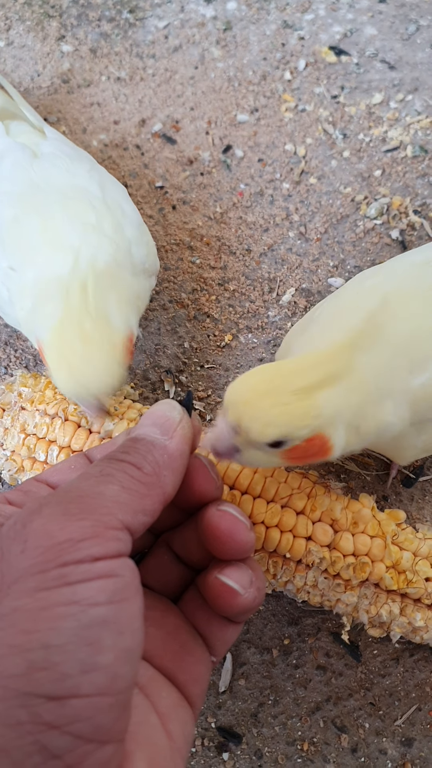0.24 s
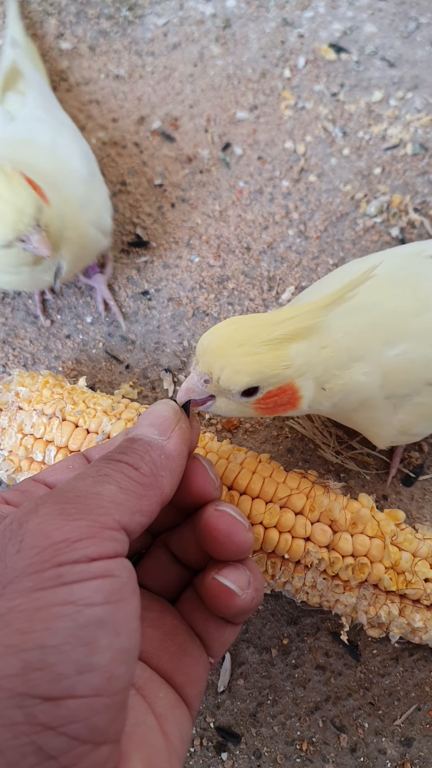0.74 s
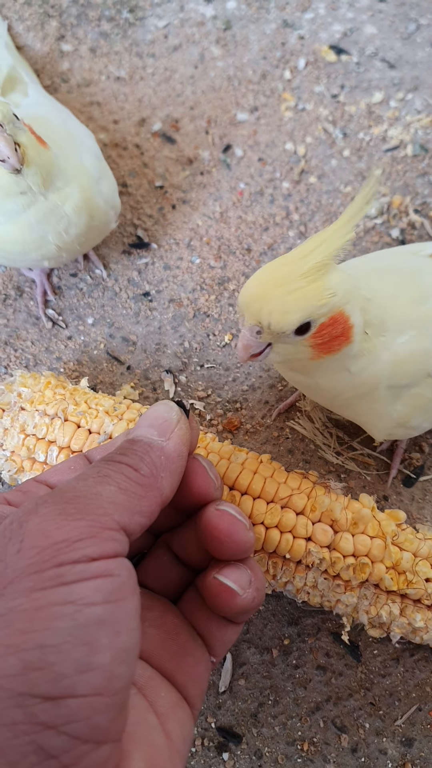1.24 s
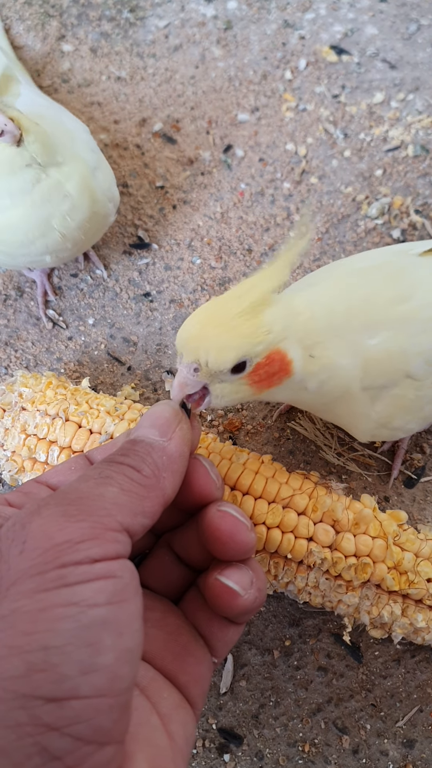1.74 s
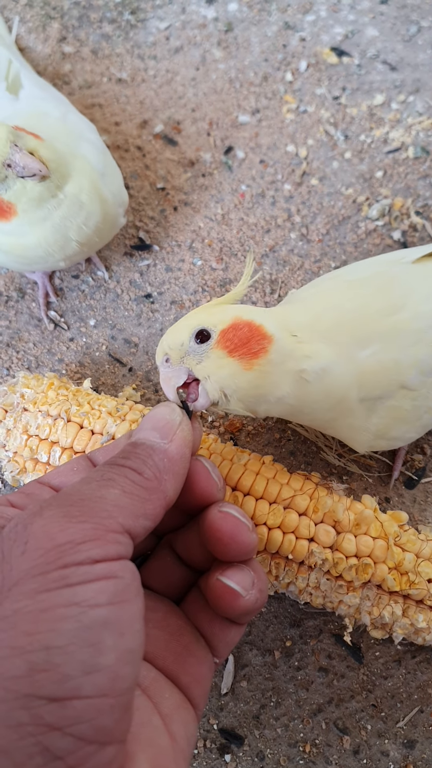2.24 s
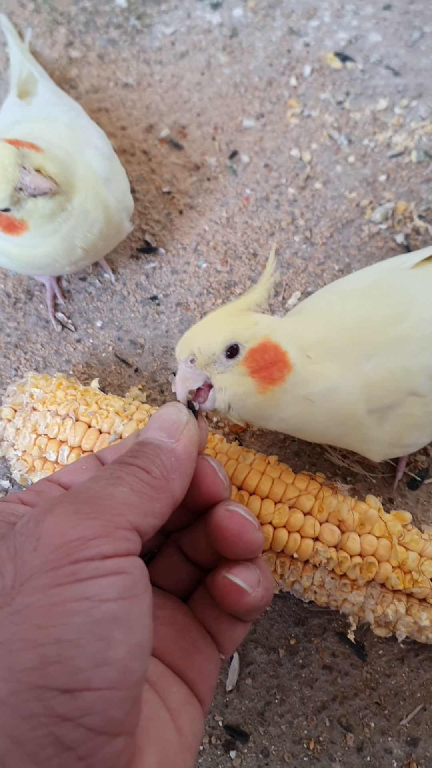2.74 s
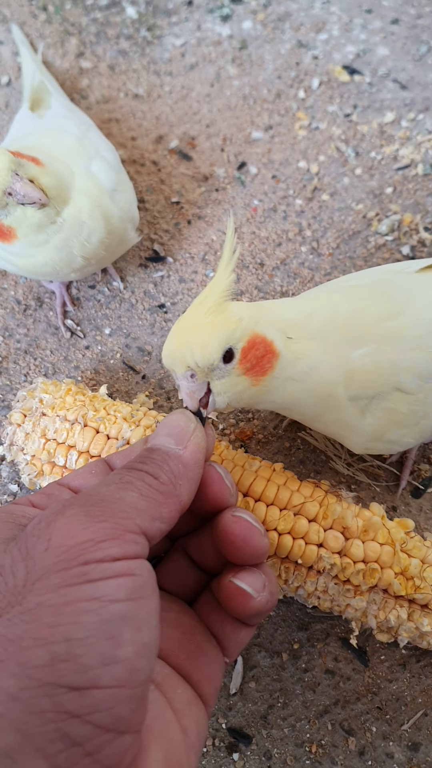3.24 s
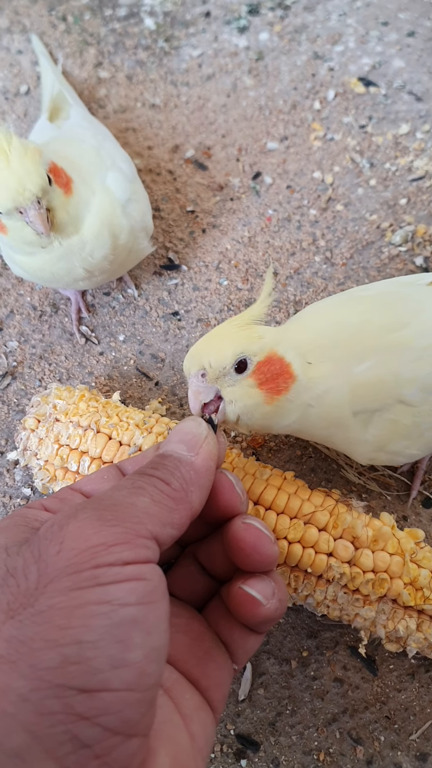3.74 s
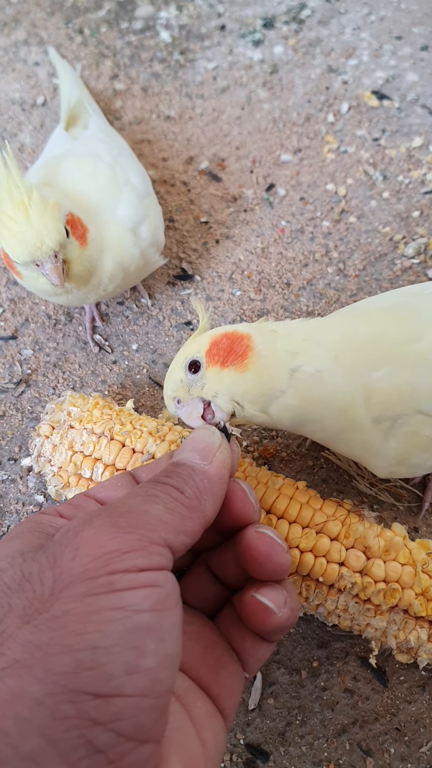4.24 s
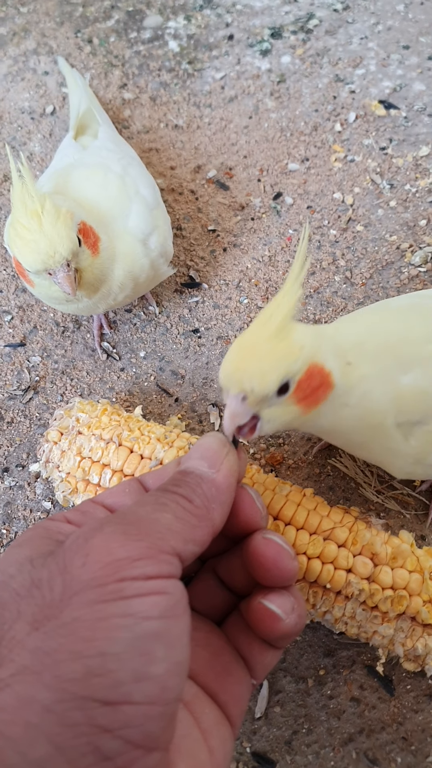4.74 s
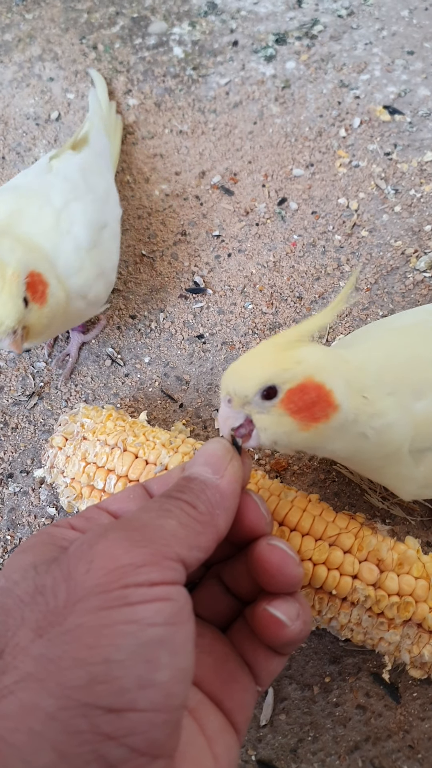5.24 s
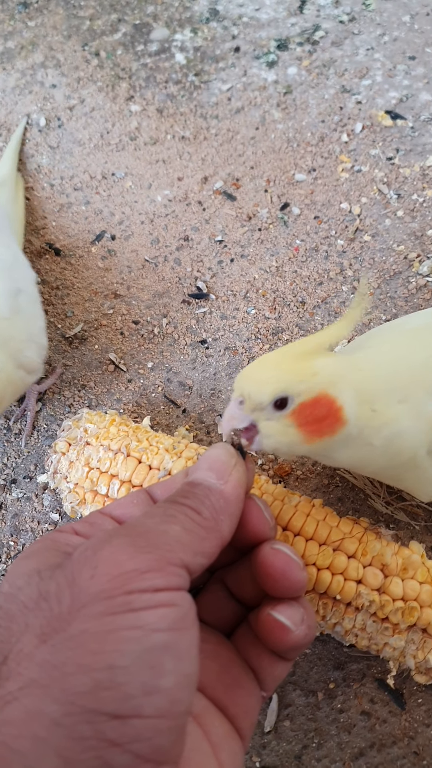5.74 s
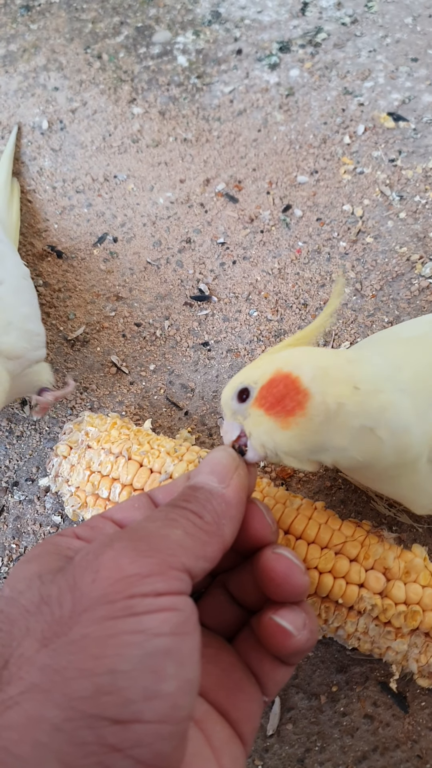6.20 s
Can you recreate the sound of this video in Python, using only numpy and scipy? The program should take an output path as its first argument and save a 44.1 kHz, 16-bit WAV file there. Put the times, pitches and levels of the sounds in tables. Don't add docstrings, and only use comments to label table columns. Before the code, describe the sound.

Small parrots whistle bright rising, stepped and arching calls in a hard-walled aviary, with beak cracks and scratches close by over a low engine hum.

```python
import sys
import numpy as np
from scipy import signal
from scipy.fft import rfft, irfft, next_fast_len
from scipy.io import wavfile
from scipy.ndimage import uniform_filter1d, minimum_filter1d

SR = 44100
rng = np.random.default_rng(int(sys.argv[2]) if len(sys.argv) > 2 else 0)


def inscribe(sig):
    pcm = np.round(np.clip(np.atleast_2d(sig).T, -1, 1) * 32767)
    wavfile.write(sys.argv[1], SR, pcm.astype(np.int16))


def gain_from_db(level_db):
    decades = np.asarray(level_db, float) / 20
    return 10 ** decades


N = 285327
LEAD = 11025


def on_log(table, hz):
    f, v = np.transpose(table)
    return np.interp(np.log(np.maximum(hz, 1)), np.log(f), v)


def shape(x, gain):
    n = next_fast_len(x.shape[-1], True)
    hz = np.arange(n // 2 + 1) * SR / n
    return irfft(rfft(x, n) * gain(hz), n)[..., :x.shape[-1]]


def unit(x):
    return x / np.sqrt(np.mean(x ** 2))


def walk(rate, size=N):
    k = int(SR / rate)
    held = np.repeat(rng.standard_normal(size // k + 1), k)
    return 1.4 * uniform_filter1d(uniform_filter1d(held, k), k)[:size]


# pitch_hz, correlation (0-1)
PORT_LIKENESS = [(60, 0.98), (130, 0.97), (290, 0.72), (640, 0.33), (1410, -0.01), (3100, -0.02),
                 (6820, 0.04), (15000, -0.02)]


def wide_noise():
    mid, side = rng.standard_normal((2, N))
    like = lambda hz: np.clip(on_log(PORT_LIKENESS, hz), 0, 1)
    mid = shape(mid, lambda hz: np.sqrt((1 + like(hz)) / 2))
    side = shape(side, lambda hz: np.sqrt((1 - like(hz)) / 2))
    return np.array([mid + side, mid - side])


# band_hz, t60_s
WALL_DECAY = [(1200, 0.41), (3000, 0.38), (6000, 0.3), (12000, 0.26)]


def aviary(x, direct_db, gap_ms, build_ms):
    t = np.arange(SR * 3 // 4) / SR
    noise = rng.standard_normal((2, len(t)))
    centres = [hz for hz, _ in WALL_DECAY]
    tail = 0
    for k, (hz, t60_s) in enumerate(WALL_DECAY):
        this_band = list(zip(centres, np.arange(len(centres)) == k))
        band = shape(noise, lambda f: on_log(this_band, f))
        tail = tail + band * np.exp(-np.log(1000) * t / t60_s)
    tail = tail * np.clip((1000 * t - gap_ms) / build_ms, 0, 1)
    tail = tail / np.sqrt(np.sum(tail ** 2) / 2)
    tail[[0, 1], [0, 20]] = gain_from_db(direct_db)
    return signal.fftconvolve(x[None], tail, axes=1)[:, :len(x)]


# start_s, width_s, town_db, boom_db
TRAFFIC_SWELLS = [(.0, .1, 4, -6.5), (.45, 0.22, 2, 2.5), (.8, 0.065, -0.5, 5.5), (1.35, 0.1, 3, 1.5),
                  (2.1, 0.32, 3.5, .5), (3.36, 0.082, 5.5, 5.5), (4.2, 0.61, 0.5, 0), (4.9, 0.087, 7, 6),
                  (6.4, 0.22, 3.5, 1)]


def traffic_swells():
    t = np.arange(N) / SR
    return sum(np.outer(db, np.exp(-((t - s) / width) ** 2)) for s, width, *db in TRAFFIC_SWELLS)


# pitch_hz, level_db (per Hz)
TOWN_COLOUR = [(100, -37), (170, -19.5), (237, 5), (296, -13), (336, -7), (440, -13), (623, -3),
               (778, -7.5), (956, -11.5), (2010, -16.5), (3290, -20.5), (3730, -26), (5900, -28.5),
               (7300, -41.5), (9750, -40), (16500, -53)]


def town(swell_db):
    colour = lambda hz: gain_from_db(on_log(TOWN_COLOUR, hz)) * np.clip(hz / 170, 0, 1) ** 3
    hum = unit(shape(wide_noise(), colour))
    return gain_from_db(-53.5 + swell_db + 0.4 * walk(7.0)) * hum


# pitch_hz, width_hz, level_db
AIR_MODES = [(83.5, 10, 11.5), (117.4, 25, 2.5), (158.4, 8, 0), (184, 2.8, -20.5), (240, 16, -9),
             (310, 16, -8)]
# start_s, load_db
ENGINE_LOAD = [(0, -20), (.3, -25.5), (.42, -8.5), (.67, -5), (.9, -5), (1.05, -15), (1.35, -6),
               (1.65, -20), (1.9, -8.5), (2.3, -10.5), (2.7, -6.5), (2.9, -21.5), (3.6, -15), (4.5, -25.5),
               (5.6, -19), (6.47, -18.5)]
# start_s, level_db
EXHAUST_LEVEL = [
    (0, -70),
    (2, -69),
    (2.4, -70.5),
    (2.9, -74),
    (3.4, -80),
    (3.7, -93),
    (4.3, -112),
    (6.47, -112),
]
# pitch_hz, level_db (per Hz)
EXHAUST_COLOUR = [(530, -38), (900, -29.5), (1010, -4.5), (1320, -5.5), (2960, -5), (6050, -9),
                  (7410, -20.5), (11000, -15.5), (15500, -25)]


def diesel(swell_db):
    t = np.arange(N) / SR
    load_db = np.interp(t, *np.transpose(ENGINE_LOAD))
    hiss_db = np.interp(t, *np.transpose(EXHAUST_LEVEL))
    cycles = (t - .045) * 11 + 0.02 * walk(1.6)
    strengths = gain_from_db(1.4 * rng.standard_normal(100))
    strength = strengths[np.clip(cycles + 1, 0, 99).astype(int)]
    puff = strength * (1 + np.cos(2 * np.pi * (cycles - .17))) / 2
    thud = strength * np.sin(np.pi * np.clip(cycles % 1 / 0.088, 0, 1)) ** 2

    dull = lambda hz: 1 / (1 + (hz / 1500) ** 2)
    modes = lambda hz: sum(gain_from_db(g) * 1j * hz * w / (f * f - hz * hz + 1j * hz * w) for f, w, g in AIR_MODES)
    thud = shape(thud, lambda hz: (modes(hz) + .4 * np.clip(hz / 28, 0, 1) ** 2) * dull(hz))
    air = shape(wide_noise(), lambda hz: np.abs(modes(hz)) * np.clip(hz / 65, 0, 1) ** 2 * dull(hz))
    boom_db = -41 + .25 * load_db + swell_db
    boom = gain_from_db(boom_db) * unit(air) + gain_from_db(-36.5 + load_db) * unit(thud)

    colour = lambda hz: gain_from_db(on_log(EXHAUST_COLOUR, hz)) * np.clip(hz / 900, 0, 1) ** 3
    hiss = unit(shape(wide_noise(), colour))
    top = shape(hiss, lambda hz: np.clip(hz / 7000, 0, 1) ** 4)
    hiss = hiss + top * (0.43 * puff - .6)
    return boom + gain_from_db(hiss_db + 20.0) * hiss


# start_s, length_s, pitch_hz, level_db (peak)
DOVE_COO = [
    (0.229, .07, 727, -48.5),
    (0.305, .085, 720.5, -54),
]


def dove():
    t, tone = np.arange(N) / SR, 0
    for s, length, hz, db in DOVE_COO:
        swell = np.sin(np.pi * np.clip((t - s) / length, 0, 1)) ** 2
        tone = tone + gain_from_db(db) * np.sin(2 * np.pi * hz * t) * swell
    return gain_from_db(6.5) * aviary(tone, 7.2, 9.6, 10)


# start_s, level_db (peak)
WIRE_TAPS = [
    (3.4901, -32.5),
]
# pitch_hz, level_db, t60_s (undamped)
WIRE_PARTIALS = [(2315, -13.5, 0.87), (2930, 6.5, 0.14), (3280, -2.5, 0.35), (3670, -3.5, 0.3),
                 (4710, 4, 0.39), (5230, 1, 0.55), (5800, -7, 0.3)]


def wire():
    out, t = np.zeros(N + SR), np.arange(SR // 2) / SR
    damping = .04
    for s, db in WIRE_TAPS:
        ring = 0
        for hz, partial_db, t60_s in WIRE_PARTIALS:
            decay = np.exp(-np.log(1000) * t / (damping * t60_s))
            ring = ring + gain_from_db(partial_db) * np.sin(2 * np.pi * hz * t) * decay
        i = int(s * SR)
        out[i:i + len(t)] += gain_from_db(db) * ring
    return aviary(out[:N], -12, 2.5, 8)


# start_s, level_db (peak), body_db, pan_db (left minus right)
SEED_CRACKS = [(0.195, -53.5, 5, 4.5), (0.7265, -45.5, -24, -5), (1.876, -53, -7, -2.5),
               (2.3344, -48.5, -16.5, 14), (2.7341, -47, 14, -1.5), (2.8565, -65, -1, -7),
               (3.2533, -32.5, 12, 2), (3.6331, -52.5, -11.5, 10.5), (4.31, -52.5, -9, 11.5),
               (4.3357, -45.5, 7.5, 9.5), (4.4947, -68, 12, 4), (4.611, -76.5, 15.5, 3),
               (4.7887, -65, 10.5, 8), (5.308, -45, -11, -2.5), (5.5649, -46.5, -12.5, -0.5),
               (5.7049, -69.5, -17, 8), (5.8821, -69, -3, -3)]
# start_s, level_db (peak), body_db, length_ms, pan_db (left minus right)
PERCH_SCRATCHES = [
    (0.8554, -40, 9.5, 16, 3.5),
    (1.912, -31.5, 8, 17, 0.5),
    (2.5476, -30, -1.5, 28, 0),
    (3.2983, -38, 3, 20, 1.5),
    (3.489, -42, 7, 7.2, 1),
    (5.3171, -36, 14.5, 4.1, -2.5),
    (6.461, -42, -10, 5.9, 1),
]


def beaks():
    near, far, t = np.zeros((2, N + SR)), np.zeros(N + SR), np.arange(SR // 5) / SR
    rows = [(s, db, body_db, 1.1, pan_db, -4.5) for s, db, body_db, pan_db in SEED_CRACKS]
    rows += [(*row, -4) for row in PERCH_SCRATCHES]
    for s, db, body_db, ms, pan_db, walls_db in rows:
        noise, i = rng.standard_normal((2, len(t))), int(s * SR)
        body = lambda hz: gain_from_db(body_db) * np.clip(hz / 900, 0, 1) ** 2
        colour = lambda hz: np.where(hz > 4000, 1, body(hz)) / (1 + (hz / 12000) ** 2 * ms / 6)
        burst = gain_from_db(db) * shape(noise, colour) * np.exp(-1000 * t / ms)
        near[:, i:i + len(t)] += burst * gain_from_db([[pan_db / 2], [-pan_db / 2]])
        far[i:i + len(t)] += gain_from_db(walls_db) * burst[0]
    return near[:, :N] + aviary(far[:N], -46, 2.1, 7.4)


# glide bend (power), slope_db (per octave under its top), overtone lift_db, shrill_db,
# release_db (lost if it ends the call)
RISE_RULE = (0.98, 16, -3.5, 6, 1.5)
STEP_RISE_RULE = (0.8, 20.5, -1, 2.5, 1.5)
HOLD_RULE = (1.17, 6.5, -6.5, -0.5, 27.5)
FALL_RULE = (0.64, 6, -4, 1.5, 21)


def sing(notes, voices, rise):
    u, paths = np.linspace(0, 1, 12), []
    for s, length, a_hz, b_hz, db in notes:
        rule = HOLD_RULE
        if b_hz > 1.1 * a_hz:
            rule = rise
        elif a_hz > 1.1 * b_hz:
            rule = FALL_RULE
        bend, slope_db, lift_db, shrill_db, release_db = rule
        _, rough_db, low_db, sharp_db = [v for v in voices if v[0] < s + .05][-1]
        hz = a_hz * (b_hz / a_hz) ** u ** bend
        last = not any(s < n[0] < s + length + .03 for n in notes)
        db = db + slope_db * np.log2(hz / hz.max()) - last * release_db * u ** 2.62
        lift_db = rough_db + lift_db + low_db * np.log2(2800 / hz)
        paths.append(np.transpose([s + length * u, hz, db, lift_db, shrill_db + sharp_db + 0 * u]))
    return paths


# pitch_hz, level_db (against the whistle)
THROAT_COLOUR = [(2400, -7), (3600, -0.5), (4800, -9), (5400, -11.5), (6300, -27.5), (7000, -27.5)]


def parrot(calls, beak, air_db, hoarse_db):
    out = np.zeros(N + LEAD)
    warble, rasp, tremor = (walk(rate, size=len(out)) for rate in (70, 420, 260))
    air = shape(rng.standard_normal(len(out)), lambda hz: gain_from_db(on_log(beak, hz)) * (hz > 7000))
    throat_band = lambda hz: gain_from_db(on_log(THROAT_COLOUR, hz) / 2) * (hz > 3300) * (hz < 6800)
    hoarse = unit(shape(rng.standard_normal(len(out)), throat_band))
    for call in calls:
        s, *columns = np.transpose(call)
        i = np.arange(int(s[0] * SR), int(s[-1] * SR)) + LEAD
        hz, db, lift_db, shrill_db = (np.interp((i - LEAD) / SR, s, c) for c in columns)
        hz = uniform_filter1d(hz, size=350) * (1.025 + .012 * warble[i] - .033 * np.abs(rasp[i]))
        phase = 2 * np.pi * np.cumsum(hz) / SR
        tone = np.sin(phase) + gain_from_db(air_db + shrill_db) * air[i]
        tone += gain_from_db(hoarse_db + lift_db / 2) * hoarse[i]
        for k in range(2, 13):
            by_beak_db = shrill_db + on_log(beak, k * hz)
            by_throat_db = lift_db + on_log(THROAT_COLOUR, k * hz)
            overtone_db = -.6 * (k - 2) + np.where(k * hz > 7000, by_beak_db, by_throat_db)
            tone += (k * hz < 16000) * gain_from_db(overtone_db) * np.sin(k * phase)
        edge = np.clip(np.minimum(i - i[0], i[-1] - i) / (0.0037 * SR), 0, 1)
        out[i] += np.sqrt(2) * gain_from_db(db + 3 * tremor[i]) * edge * tone
    return out


# start_s, overtone lift_db, low_db (extra lift per octave under the throat pitch), shrill_db
CALL_VOICES = [
    (-.2, 1.5, -1.5, 3),
    (.235, 3, 5, 1.5),
    (.925, -6, 14, -4.5),
    (1.457, -2, 16.5, -3.5),
    (2.937, 0, 15, 4.5),
    (3.825, -7, 8.5, -1),
    (4.858, 1, 10.5, -0.5),
    (6.095, -2, -2, -5.5),
]
ANSWERING_VOICE = [
    (1.08, 10, 3, 5),
]
# pitch_hz, level_db
ARCH_BEAK = [(7000, -39.5), (8600, -54), (10100, -53.5), (11600, -39.5), (13000, -49.5), (14600, -39),
             (16000, -48)]
# start_s, length_s, from_hz, to_hz, level_db (whistle)
ARCHED_CALLS = [
    (1.457, .143, 1303, 3037, -18),
    (1.6, .068, 2954, 3014, -18.5),
    (1.668, .12, 2878, 1877, -22),
    (2.937, .128, 1236, 2482, -26.5),
    (3.065, .032, 2566, 2757, -21),
    (3.097, 0.12, 2760, 1618, -22),
    (4.858, .157, 1250, 2958, -19.5),
    (5.015, .063, 3033, 3087, -19),
    (5.078, .15, 2951, 1896, -21),
]
SHRILL_CALL = [
    (.235, 0.054, 1360, 2360, -23),
    (.29, 0.022, 2555, 3000, -22),
    (.315, .068, 2980, 2880, -23),
    (.383, 0.046, 2250, 3200, -19),
    (.425, .06, 3260, 3230, -23.5),
]
ANSWER_CALL = [
    (1.08, .155, 1280, 3385, -19.5),
    (1.235, 0.041, 3464, 3498, -13.5),
]


def first_perch():
    calls = sing(ARCHED_CALLS, CALL_VOICES, RISE_RULE)
    calls += sing(SHRILL_CALL, CALL_VOICES, STEP_RISE_RULE)
    calls += sing(ANSWER_CALL, ANSWERING_VOICE, RISE_RULE)
    return aviary(parrot(calls, ARCH_BEAK, 2.2, -32), -6, 2.0, 11.0)


# pitch_hz, level_db
STEP_BEAK = [(7000, -36), (8600, -36), (10100, -40), (11400, -51), (12600, -56), (14500, -60.5),
             (16000, -60)]
# start_s, length_s, from_hz, to_hz, level_db (whistle)
STEPPED_CALLS = [(-.2, .15, 1274, 2555, -17), (-.05, 0.12, 2971, 2914, -17.5),
                 (.085, .03, 2700, 1800, -18.5), (.925, 0.059, 1388, 2412, -22.5),
                 (.99, 0.094, 2918, 2840, -18.5), (1.092, 0.094, 3198, 3202, -18.5),
                 (3.825, 0.084, 1495, 2703, -19), (3.891, 0.049, 2724, 2890, -16),
                 (3.961, .095, 2768, 2771, -18), (6.095, 0.071, 1588, 1858, -33.5),
                 (6.15, .033, 1833, 2800, -19.5), (6.18, .06, 2950, 2893, -24.5),
                 (6.24, .037, 2250, 3350, -15), (6.277, 0.055, 3395, 3386, -16.5)]
FAR_PEEPS = [
    (2.79, 0.028, 2900, 3180, -56),
    (4.72, 0.044, 2700, 2816, -66.5),
]
SYRINX_UNDERTONES = [
    (0.296, 0.12, 2250, 2420, -29),
    (0.992, 0.13, 2054, 2165, -29.5),
    (3.888, .09, 2052, 2160, -30),
    (6.176, 0.12, 1964, 2138, -29.5),
]


def second_perch():
    calls = sing(STEPPED_CALLS, CALL_VOICES, STEP_RISE_RULE)
    calls += sing(FAR_PEEPS + SYRINX_UNDERTONES, CALL_VOICES, RISE_RULE)
    return aviary(parrot(calls, STEP_BEAK, -8.5, -29), -7, 2.3, 9)


def scene():
    town_swell_db, boom_swell_db = traffic_swells()
    background = town(town_swell_db) + diesel(boom_swell_db) + dove()
    calls = gain_from_db(4.0) * (first_perch() + second_perch())
    shade = lambda hz: gain_from_db(4.5 * np.clip((hz - 7000) / 2500, 0, 1))
    left = shape(calls[0], shade)
    right = shape(calls[1], lambda hz: 1 / shade(hz))
    calls = np.array([left, right])[:, LEAD:]
    return background + wire() + beaks() + calls


def roll_off(x):
    return signal.sosfilt(signal.butter(12, 15730, fs=SR, output="sos"), x)


# pitch_hz, level_db (left minus right)
PORT_COLOUR = [(60, 1.5), (110, -3), (200, 0.5), (380, -3), (700, -1), (1290, -1), (2380, -1.5),
               (4400, -1.5), (8120, 5.5), (15000, 1)]


def record(dry):
    left = shape(dry[0], lambda hz: gain_from_db(on_log(PORT_COLOUR, hz) / 2))
    right = shape(dry[1], lambda hz: gain_from_db(-on_log(PORT_COLOUR, hz) / 2))
    both = np.array([left, right]) * np.clip(np.arange(N) / 90, 0, 1)
    peak = np.abs(both).max(axis=0) + 1e-9
    limit = minimum_filter1d(np.minimum(1, 1 / peak), size=441)
    return roll_off(both * uniform_filter1d(limit, size=221))


dry = scene()
out = record(dry)
inscribe(out)
```